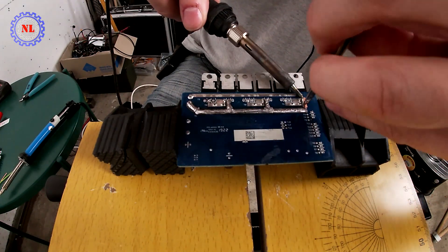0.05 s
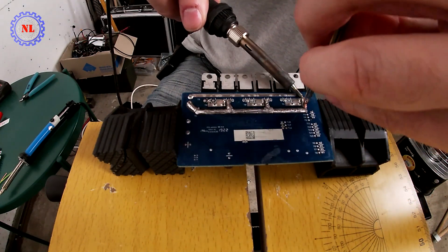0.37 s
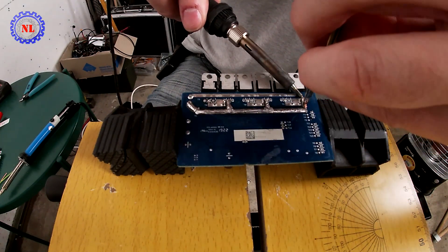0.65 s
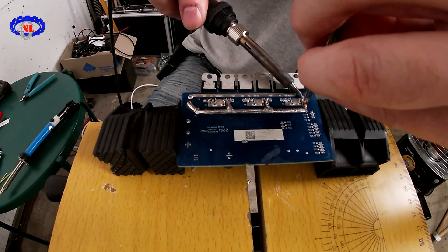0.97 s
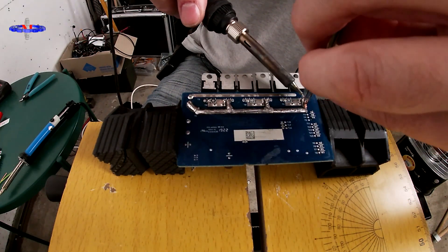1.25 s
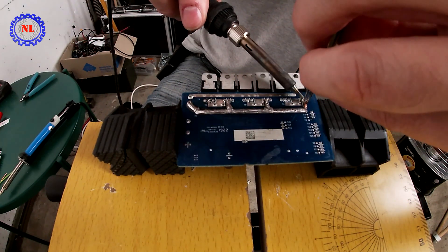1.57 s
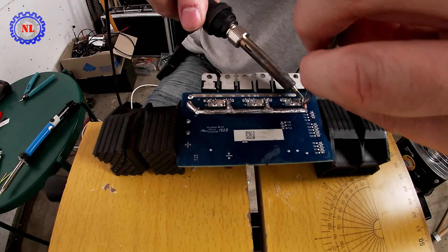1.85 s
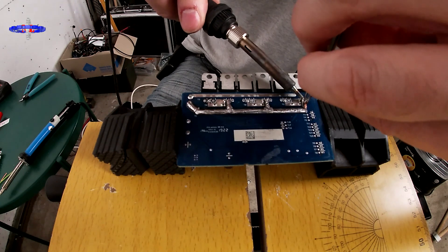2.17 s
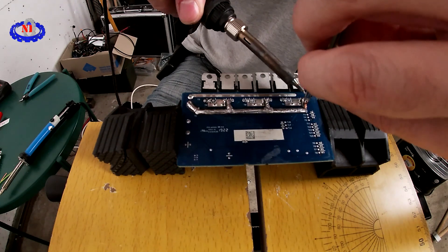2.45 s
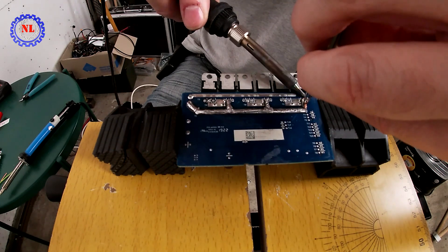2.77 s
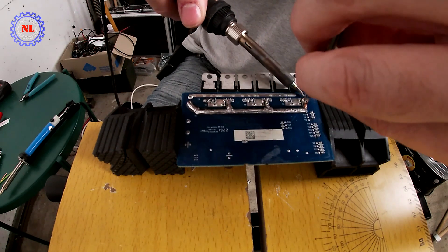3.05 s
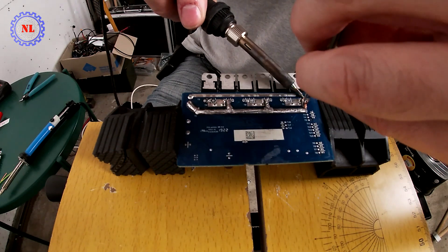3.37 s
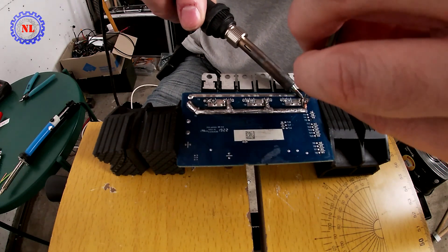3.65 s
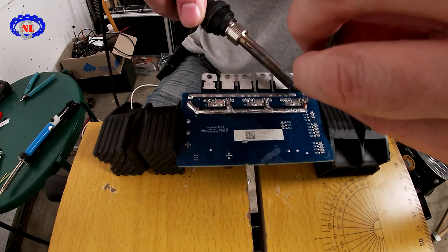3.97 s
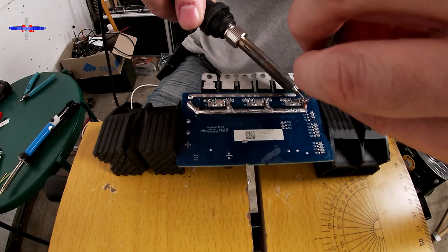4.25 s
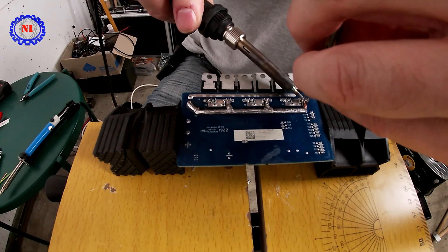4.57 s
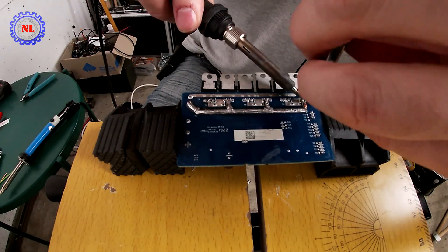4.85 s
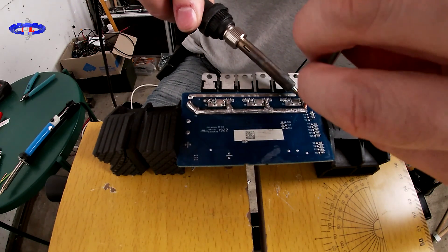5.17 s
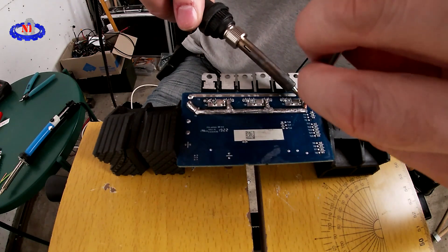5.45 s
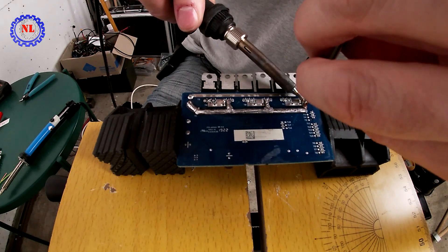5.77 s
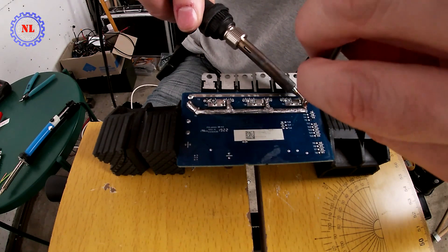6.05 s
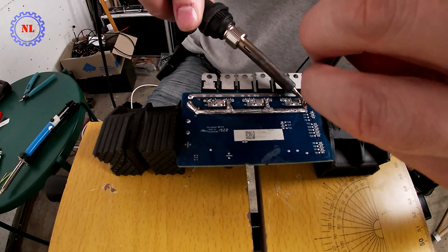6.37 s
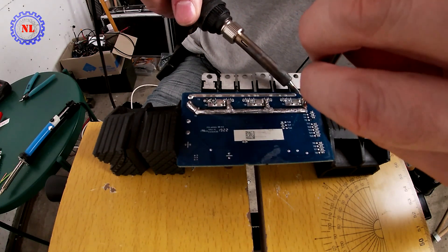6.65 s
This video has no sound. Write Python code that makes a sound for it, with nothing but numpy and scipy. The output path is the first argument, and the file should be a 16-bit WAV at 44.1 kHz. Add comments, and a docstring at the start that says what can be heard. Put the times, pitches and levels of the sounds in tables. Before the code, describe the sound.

A vehicle's low hum swells and fades outside as a soldering iron lightly taps, knocks and briefly squeaks on a circuit board.

```python
"""A faint rustle of handling opens over the room tone; a close camera chirps faintly at its frame rate.
A soldering iron and solder wire tick, knock and scrape on a clamped circuit board, exciting its modes.
Outside, what is probably a vehicle nears with a rush of tyres; a soft hiss, perhaps flux, rises close by.
The engine's hum swells and drops in pitch by the Doppler effect; a rumble surges and fades as it recedes.
Late on, the tip squeaks by stick-slip friction among more ticks, and a few soft, low bumps follow."""
import sys
import numpy as np
from scipy import signal
from scipy.fft import rfft, irfft, next_fast_len
from scipy.io import wavfile
from scipy.ndimage import map_coordinates

SR = 44100
rng = np.random.default_rng(int(sys.argv[2]) if len(sys.argv) > 2 else 0)


def put_to_file(sound):
    """Save the sound as 16-bit audio at rate SR, in the file named by the first command-line argument."""
    columns = np.atleast_2d(sound).T  # one column per channel
    safe = np.clip(columns, -1, 1)
    whole_steps = np.round(safe * 32767)
    wavfile.write(sys.argv[1], SR, whole_steps.astype(np.int16))


N = 296307

# Noise spectra, as relative level per hertz: frequency_hz, density_db
ROOM_TONE_SPECTRUM = [(25, 8.5), (55, 3.5), (100, -15), (170, 12), (210, 4.5), (238, 8.5), (262, -3.5),
                      (285, 1.5), (330, -4), (580, -6.5), (790, 2), (1080, -8.5), (1360, -1.5), (1900, -12),
                      (2500, -17), (6200, -20), (12500, -34.5), (13500, -58)]
HISS_SPECTRUM = [(1500, 1.5), (1950, 13.5), (2400, 5), (2800, 3), (3800, -3), (4450, 0), (5000, -4),
                 (6500, -10.5), (10000, -23), (14000, -54)]
TYRE_SPECTRUM = [(120, -9), (290, 0), (380, -8), (500, -4.5), (600, -10.5), (700, -1), (880, -4.5),
                 (1060, -7.5), (1380, -3.5), (1940, -10.5), (2300, -19.5), (3500, -32.5), (5500, -38.5),
                 (9000, -81)]
RUMBLE_SPECTRUM = [(15, -19), (38, -1.5), (60, -12.5), (85, -3.5), (105, -25.5), (145, -5.5), (180, 7),
                   (212, -1), (238, 6.5), (263, -5), (284, 2), (305, -4), (360, -8), (600, -11.5),
                   (1200, -75), (4000, -100)]
BOOM_SPECTRUM = [(20, -10), (42, -1), (75, -10), (108, -5), (140, -18), (300, -45), (900, -85)]
TICK_SPECTRUM = [(500, -28), (2400, -10), (3400, -7), (4200, -3), (4900, -1), (5700, 0), (6800, -3),
                 (8000, -11), (11000, -40), (15000, -70)]
SNAP_SPECTRUM = [(4000, -30), (6500, -3), (8200, -1.5), (9200, -7), (9900, -1.5), (10700, -8), (12200, -3),
                 (13000, -18), (15000, -34)]
KNOCK_SPECTRUM = [(100, -35), (420, -16), (540, -6), (700, -3), (950, 2), (1150, -6), (1600, -14),
                  (3000, -35), (6000, -75)]
RASP_SPECTRUM = [(400, -13), (900, -7), (1500, -9), (1950, 3), (2350, -9), (3300, -7), (3700, -10),
                 (4200, -1), (4700, 1), (5000, -2), (5400, 3), (6300, -3), (6750, 1), (7200, -8),
                 (7700, -4), (9100, -16), (9800, -7), (10700, -19), (12500, -20), (15000, -35)]

# A faint rustle of handling, then a soft hiss, perhaps flux: start_s, gain_db, rise_s, t60_s
HISSES = [(0.0, -80, 0.38, 4.8), (2.64, -51, 0.45, 3.7)]
# Envelopes of the engine's fundamental and third harmonic, before trim and flutter: time_s, level_db
FUNDAMENTAL_ENVELOPE = [(0.0, -77), (0.3, -77), (0.87, -56), (1.2, -79.5), (1.81, -69), (2.02, -72),
                        (2.13, -52.5), (2.31, -46), (2.82, -48), (3.03, -40.5), (3.57, -43), (3.75, -50),
                        (3.84, -39), (4.14, -41), (4.5, -51), (4.65, -64.5), (4.98, -72), (5.13, -58.5),
                        (5.3, -76), (5.45, -57), (6.28, -75.5), (6.42, -58), (6.69, -66.5)]
THIRD_ENVELOPE = [(0.03, -58), (0.52, -70.5), (0.75, -59), (0.9, -65), (1.25, -70.5), (1.62, -57.5),
                  (2.0, -55.5), (2.08, -72), (2.24, -48), (2.39, -56), (2.48, -48.5), (3.18, -52),
                  (3.49, -57), (3.68, -39.5), (3.77, -49.5), (3.92, -43), (4.14, -48), (4.25, -39.5),
                  (4.59, -47), (4.72, -73), (4.95, -55), (5.9, -76), (6.25, -62), (6.69, -74)]
# Overtones of the engine and of the squeak: harmonic_number, relative_db
ENGINE_HARMONICS = [(2, -19.5), (4, -27), (7, -22), (8, -24.5), (11, -21)]
SQUEAK_HARMONICS = [(2, -2), (3, -7), (4, -1.5), (5, -16), (6, -18), (7, -26), (8, -27)]

# Modes of the circuit board: pitch_hz, t60_s, tapped_db, pressed_db
BOARD_MODES = [(1360, .16, -32, -20), (1500, .12, -24, -12), (1655, .05, -12, -1), (1810, .04, -3, -1),
               (1945, .05, 1.5, -2.5), (2090, .045, -10, -11), (2350, .08, -28, -18),
               (2700, .06, -24, -12.5), (2920, .05, -22, -8), (3100, .05, -25, -12), (3270, .04, -26, -13)]
# Modes of the solder wire: pitch_hz
WIRE_MODES_HZ = [3990, 4370, 4780]
# Tip contacts: start_s, level_db, snap_offset_db, board_offset_db, wire_offset_db, favoured_hz
TAPS = [(0.064, -61, -8, -11, -3, 4200), (0.114, -64, 4.5, -18, -15, 4200),
        (0.2012, -56.5, -8, 5, 5.5, 4440), (0.3673, -60, 2.5, -3, -5, 4170), (0.438, -63, 0, -15, 3, 4200),
        (0.5383, -49.5, -5.5, -0.5, 4, 4030), (0.726, -67.5, -4, 9.5, 13.5, 4200),
        (1.0065, -64, 5, -17, 0, 4200), (1.4429, -57.5, -4, 6.5, -18, 4200), (1.565, -53, -5, -12, 1, 4320),
        (2.3628, -41.5, 1.5, 0.5, -4, 4700), (2.381, -51, 3, -10, -3, 4670),
        (2.6642, -60, -19, 4, -8, 4200), (3.951, -45.5, -7, -27, -1, 3950),
        (4.2222, -42, -6.5, -1, -4, 4400), (4.2252, -43, -10, -5, -12, 4500),
        (5.1918, -60, 0, 4, -13, 4200), (5.4734, -35.5, -11, -4, -11, 4530),
        (5.5745, -48.5, -21, -17, -9, 3950), (5.5842, -51, -20, 3, -4, 3950),
        (5.659, -55, -14, -17, -13, 4600), (5.6622, -41.5, 0, -3, -18, 4600),
        (5.6805, -54, -1, -14, -13, 4600)]
# Reverberation time of the workshop: frequency_hz, t60_s
ROOM_DECAY = [(200, 0.32), (1000, .28), (2000, 0.22), (4200, 0.2), (6000, .2), (12000, 0.05)]
# Firm presses and rebounds that rock the board in its clamp: start_s, clack_db, knock_db, thud_db
PRESSES = [(0.2012, -53, -44.5, -57), (1.4425, -58, -66, -60), (2.363, -58, -53, -62),
           (2.3805, -51, -47, -53), (4.222, -41.5, -47, -41), (4.2355, -46, -49, -50),
           (5.4729, -53, -50, -60), (5.6638, -34, -56, -34), (5.681, -49, -56, -60)]
# Wire dragged over the joint: start_s, length_s, ramp_s, rasp_db, fizz_db, wire_db, board_db, favoured_hz
SCRAPES = [(0.921, 0.045, .04, -79, -92, -76, -74, 3950), (0.97, 0.053, 0.031, -69, -81, -70.5, -86, 3950),
           (1.472, 0.03, 0.0066, -59, -70, -55, -62, 4250),
           (1.496, 0.016, .008, -71, -77, -70, -55.5, 4250), (2.391, 0.049, .012, -75, -78, -78, -69, 4400),
           (5.471, 0.028, 0.0015, -43.5, -68, -60, -53, 4330),
           (5.5, 0.02, 0.0096, -54, -75, -62, -56, 4500), (5.574, 0.019, .004, -62.5, -82, -64, -64, 4060),
           (5.654, 0.018, .005, -56, -65, -66, -65, 4600), (5.672, 0.019, .005, -63, -68, -69, -50, 4600)]
# Course of the squeak as the grip goes: time_s, pitch_hz, level_db, fundamental_offset_db
SQUEAK_COURSE = [(5.6295, 1760, -62, 0), (5.632, 1715, -45, 2), (5.637, 1685, -43.5, 2),
                 (5.642, 1660, -49, -3), (5.650, 1480, -49, -9), (5.658, 1580, -49.5, -10),
                 (5.663, 1540, -52, -12)]
# Soft low bumps: centre_s, level_db
BUMPS = [(5.92, -60), (6.07, -53), (6.14, -53), (6.5, -54)]

NEAREST_S, SPEED_M_PER_S, ROAD_DISTANCE_M, SOUND_M_PER_S = 3.4, 8.4, 5.673, 343
ENGINE_LAG_S, REAR_LAG_S = 0.365, 0.4  # hum and rumble, then rear tyres, pass later than the front
TIME_S = np.arange(N) / SR


def amp(db):
    """Amplitude ratio of a level in decibels."""
    return 10 ** (np.asarray(db) / 20)


def unit(x):
    """Normalisation to rms 1."""
    return x / np.sqrt(np.mean(x ** 2) + 1e-20)


def along(points, hz):
    """Interpolation on a logarithmic frequency axis."""
    knots_hz, values = np.transpose(points)
    return np.interp(np.log(hz + 1), np.log(knots_hz + 1), values)


def curves(rows):
    """Linear interpolation, sample by sample, of each column after the time."""
    times_s, *columns = np.transpose(rows)
    return [np.interp(TIME_S, times_s, column) for column in columns]


def wobble(rate_hz):
    """Smooth random modulation: a spline through rate_hz knots a second."""
    knots = rng.standard_normal(int(N * rate_hz / SR) + 4)
    return map_coordinates(knots, [TIME_S * rate_hz])


def filtered(x, response):
    """Linear filtering: the spectrum is multiplied by a frequency response."""
    size = next_fast_len(N + SR // 2)
    return irfft(rfft(x, size) * response(np.fft.rfftfreq(size, 1 / SR)), size)[:N]


def noise(spectrum):
    """Spectrally shaped Gaussian noise of rms 1."""
    return unit(filtered(rng.standard_normal(N), lambda hz: amp(along(spectrum, hz))))


def ringing(centre_hz, width_hz):
    """Random forcing of one resonance with tapered skirts, at rms 1."""
    def response(hz):
        resonance = 1j * hz * width_hz / (centre_hz ** 2 - hz ** 2 + 1j * hz * width_hz)
        return resonance * bell(hz - centre_hz, 2 * width_hz)
    return unit(filtered(rng.standard_normal(N), response))


def phase(hz):
    """Phase as the time integral of frequency."""
    return 2 * np.pi * np.cumsum(hz) / SR


def fade(t, rise_s, t60_s):
    """Exponential rise and damping."""
    return (1 - np.exp(-t / rise_s)) * np.exp(-np.log(1000) * t / t60_s)


def bell(offset, width):
    """Gaussian curve, down to 1/e at one width from its centre."""
    return np.exp(-(offset / width) ** 2)


def add(track, start_s, sound):
    """Superposition of a sound on the track."""
    part = track[max(round(start_s * SR), 0):][:len(sound)]
    part += sound[:len(part)]


def burst(source, start_s, t60_s):
    """A damped noise transient whose energy is set by its envelope alone."""
    envelope = fade(np.arange(SR // 5) / SR, .0002, t60_s)
    piece = source[round(start_s * SR):][:len(envelope)]
    return unit(envelope * piece) * np.sqrt(np.mean(envelope ** 2))


def modes(hz, t60_s, db, scatter_db=1.2):
    """Free vibration: damped sines start together, their levels varying from blow to blow."""
    t = np.arange(SR // 5)[:, None] / SR
    gain = amp(db + scatter_db * rng.standard_normal(len(hz)))
    return np.sum(gain * fade(t, .0002, t60_s) * np.sin(2 * np.pi * t * hz), axis=1)


def rustle_and_hiss():
    """Broadband noise with a faint whistle builds and decays: first handling, later perhaps flux."""
    hiss = noise(HISS_SPECTRUM) + amp(-25) * ringing(4480, width_hz=350)
    return hiss * sum(amp(db) * fade(np.maximum(TIME_S - start_s, 0), rise_s, t60_s)
                      for start_s, db, rise_s, t60_s in HISSES)


def passing(lag_s):
    """Spherical spreading (1 when nearest) and Doppler factor of a source lag_s behind the front."""
    ahead_m = SPEED_M_PER_S * (NEAREST_S + lag_s - TIME_S)
    distance_m = np.hypot(ahead_m, ROAD_DISTANCE_M)
    return ROAD_DISTANCE_M / distance_m, 1 + SPEED_M_PER_S / SOUND_M_PER_S * ahead_m / distance_m


def engine_hum(firing_hz=60.66, waver=0.00804, neighbour_hz=175, flutter_db=5, trim_db=-2.4):
    """Periodic firing gives harmonics that fall by the Doppler effect and flutter more from afar."""
    near, doppler = passing(ENGINE_LAG_S)
    angle = phase(firing_hz * doppler * (1 + waver * wobble(8.7)))
    overtones = sum(amp(db) * np.sin(k * angle + wobble(7)) for k, db in ENGINE_HARMONICS)
    low = np.sin(angle) + overtones
    neighbour = amp(-8 + wobble(24)) * np.sin(phase(neighbour_hz + 3 * wobble(10)))
    third = np.sin(3 * angle) + neighbour  # the two beat
    depth_db = flutter_db * (1 - near)
    low_db = trim_db + curves(FUNDAMENTAL_ENVELOPE)[0] + depth_db * np.tanh(wobble(9))
    third_db = curves(THIRD_ENVELOPE)[0] + depth_db * np.tanh(wobble(12))
    return amp(low_db) * unit(low) + amp(third_db) * unit(third)


def road_noise(screen_db=-19, open_s=1.46, roar_falloff=3.2, surge_s=3.946, surge_db=5):
    """Tyre noise and rumble, screened at first, follow power laws of distance; the rumble then surges."""
    near, rear_near, engine_near = (passing(lag_s)[0] for lag_s in (0, REAR_LAG_S, ENGINE_LAG_S))
    screening = amp(screen_db * np.clip(1 - TIME_S / open_s, 0, 1))
    rush = amp(-52) * near * noise(TYRE_SPECTRUM)
    front_roar = amp(-56) * near ** roar_falloff * ringing(754, width_hz=230)
    rear_roar = amp(-60.5) * rear_near ** roar_falloff * ringing(610, width_hz=330)
    surge = bell(TIME_S - surge_s, 0.34)
    rumble = amp(-51 + surge_db * surge) * engine_near ** 1.05 * noise(RUMBLE_SPECTRUM)
    boom = amp(-49) * surge * noise(BOOM_SPECTRUM)
    return screening * (rush + front_roar + rear_roar + rumble) + boom


def camera_chirps(frame_hz=25, sweep_hz_per_s=230000, level_db=-77):
    """Camera electronics emit a linear frequency sweep in a Gaussian pulse once a frame."""
    out, t = np.zeros(N), np.arange(-SR // 200, SR // 200) / SR
    for frame_s in np.arange(.011, N / SR, 1 / frame_hz):
        rising_hz = rng.normal(8440, 91) + sweep_hz_per_s * t
        chirp = bell(t, .002) * np.sin(phase(rising_hz))
        start_s = frame_s + t[0] + rng.normal(0, .0012)
        add(out, start_s, amp(level_db + rng.normal(0, 2)) * chirp)
    return out


def wire_levels(favoured_hz):
    """Modal excitation of the wire in dB: the point of contact favours modes near one pitch."""
    weight = bell(np.array(WIRE_MODES_HZ) - favoured_hz, 450)
    return 20 * np.log10(weight / np.linalg.norm(weight) + 1e-9)


def tip_taps(wire_gain_db=3, wire_t60_s=.019, detune=.025):
    """Impact excitation: a metal tick, a bright snap when hard, and free ringing of board and wire."""
    out = np.zeros(N)
    tick, snap = noise(TICK_SPECTRUM), noise(SNAP_SPECTRUM)
    board_hz, board_t60_s, tapped_db, _ = np.transpose(BOARD_MODES)
    for start_s, db, snap_db, board_db, wire_db, favoured_hz in TAPS:
        contact = burst(tick, start_s, t60_s=.012) + amp(snap_db) * burst(snap, start_s, t60_s=.0095)
        # the wire's pitches scatter as its free length changes
        wire_hz = WIRE_MODES_HZ * (1 + detune * rng.standard_normal(len(WIRE_MODES_HZ)))
        board = modes(board_hz, board_t60_s, tapped_db + board_db)
        wire = modes(wire_hz, wire_t60_s, wire_levels(favoured_hz) + wire_db + wire_gain_db)
        add(out, start_s, amp(db) * (contact + board + wire))
    return out


def reverberation(x):
    """Convolution with the workshop's short, diffuse echo, which dies faster in the treble."""
    hz, t, spectra = signal.stft(rng.standard_normal(SR // 2), SR, nperseg=256)
    decay = amp(-60 * t / along(ROOM_DECAY, hz)[:, None])
    tail = signal.istft(spectra * decay, SR, nperseg=256)[1]
    delayed_tail = np.pad(tail / np.linalg.norm(tail), (SR // 250, 0))
    return signal.fftconvolve(x, delayed_tail)[:N]


def board_presses(clamp_hz=178, pressed_extra_hz=115, relax_s=.012, bench_hz=142):
    """Damped vibration of board, support, clamp and bench; the clamp's pitch falls as it relaxes."""
    out, t = np.zeros(N), np.arange(SR // 3) / SR
    falling_hz = clamp_hz + pressed_extra_hz * np.exp(-t / relax_s)
    clamp = fade(t, .0015, t60_s=.11) * np.sin(phase(falling_hz))
    bench = amp(-11) * fade(t, .00092, t60_s=.12) * np.sin(2 * np.pi * bench_hz * t)
    support = noise(KNOCK_SPECTRUM)
    board_hz, board_t60_s, _, pressed_db = np.transpose(BOARD_MODES)
    for start_s, clack_db, knock_db, thud_db in PRESSES:
        add(out, start_s, modes(board_hz, board_t60_s, pressed_db + clack_db))
        add(out, start_s, amp(knock_db) * burst(support, start_s, t60_s=.11))
        add(out, start_s, amp(thud_db) * (clamp + bench))
    return out


def wire_scrapes():
    """Sliding friction: dense, tiny slips merge into noise and drive the resonances of wire and board."""
    out = np.zeros(N)
    rasp, fizz, board = noise(RASP_SPECTRUM), noise(SNAP_SPECTRUM), ringing(1930, width_hz=200)
    wire_bands = np.array([ringing(hz, width_hz=170) for hz in WIRE_MODES_HZ])
    for start_s, length_s, ramp_s, rasp_db, fizz_db, wire_db, board_db, favoured_hz in SCRAPES:
        inside_s = np.minimum(TIME_S - start_s, start_s + length_s - TIME_S)
        stroke = np.clip(inside_s / ramp_s + .5, 0, 1)
        on = stroke > 0
        friction = amp(rasp_db) * rasp[on] + amp(fizz_db) * fizz[on]
        wire = unit(amp(wire_levels(favoured_hz)) @ wire_bands[:, on])
        out[on] += stroke[on] * (friction + amp(wire_db) * wire + amp(board_db) * unit(board[on]))
    return out


def vehicle_drone(pitch_hz=169.6, peak_db=-47.5, peak_s=3.18, width_s=0.27):
    """Beating: as the vehicle comes close, a tone swells just below the hum's third harmonic."""
    tone = unit(np.sin(phase(pitch_hz + wobble(5.41))))
    return amp(peak_db) * bell(TIME_S - peak_s, width_s) * tone


def tip_squeak(start_jitter=.02, jitter_per_s=2.2):
    """Stick-slip oscillation: the harmonic tone sags, thins and roughens as the tip loses grip."""
    start_s, end_s = SQUEAK_COURSE[0][0], SQUEAK_COURSE[-1][0]
    t, length_s = TIME_S - start_s, end_s - start_s
    hz, level_db, fundamental_db = curves(SQUEAK_COURSE)
    jitter = (start_jitter + jitter_per_s * np.clip(t, 0, length_s)) * wobble(1500)
    shimmer_db = 2 * wobble(1200)
    angle = phase(hz * (1 + jitter))
    overtones = sum(amp(db) * np.sin(k * angle) for k, db in SQUEAK_HARMONICS)
    tone = amp(fundamental_db) * np.sin(angle) + overtones
    return tone * amp(level_db + shimmer_db) * (t > 0) * (t < length_s)


def low_bumps(pitch_hz=47.4, width_s=0.017):
    """Each dull bump, probably from handling, is a wave packet of about two slow cycles."""
    out = np.zeros(N)
    for centre_s, db in BUMPS:
        t = TIME_S - centre_s
        out += amp(db) * bell(t, width_s) * np.sin(2 * np.pi * pitch_hz * t)
    return out


def scene():
    """Superposition of the close handwork and its echo, the passing vehicle and the background."""
    work = tip_taps() + board_presses() + wire_scrapes() + tip_squeak()
    soldering = work + amp(-14) * reverberation(work) + rustle_and_hiss()
    vehicle = engine_hum() + vehicle_drone() + road_noise()
    room_tone = amp(-62) * noise(ROOM_TONE_SPECTRUM)
    return (soldering + vehicle + room_tone + camera_chirps() + low_bumps())[None]


def record(dry):
    """Ideal low-pass filtering: the camera keeps nothing above its band limit."""
    return filtered(dry[0], lambda hz: hz < 15300)[None]


dry = scene()
out = record(dry)
put_to_file(out)
```